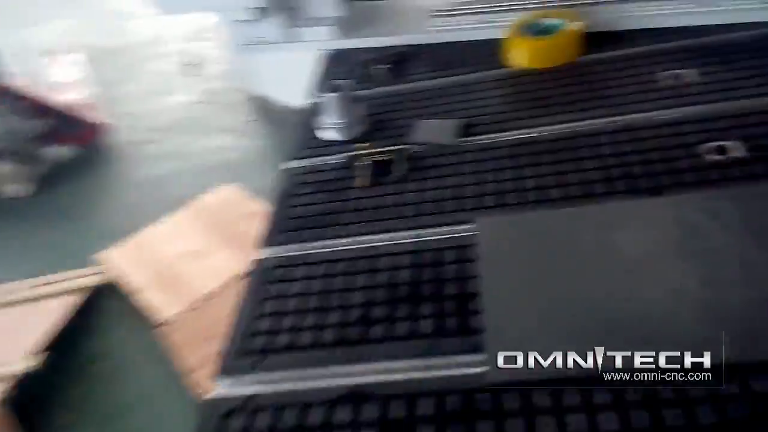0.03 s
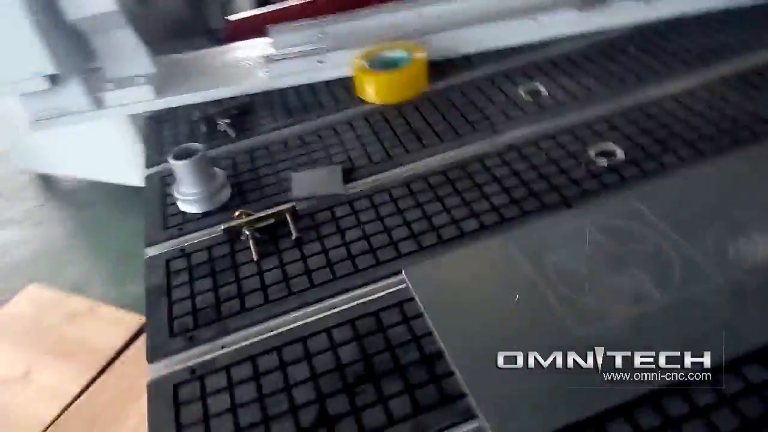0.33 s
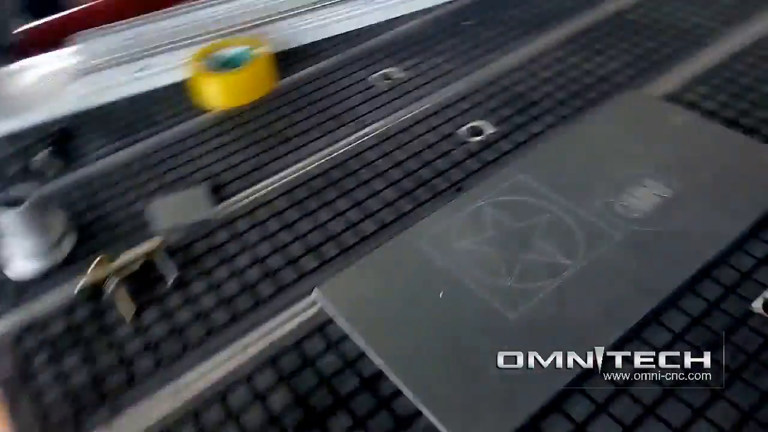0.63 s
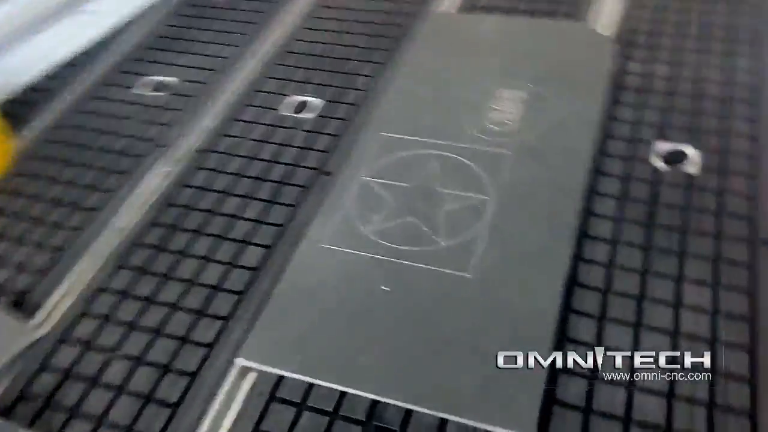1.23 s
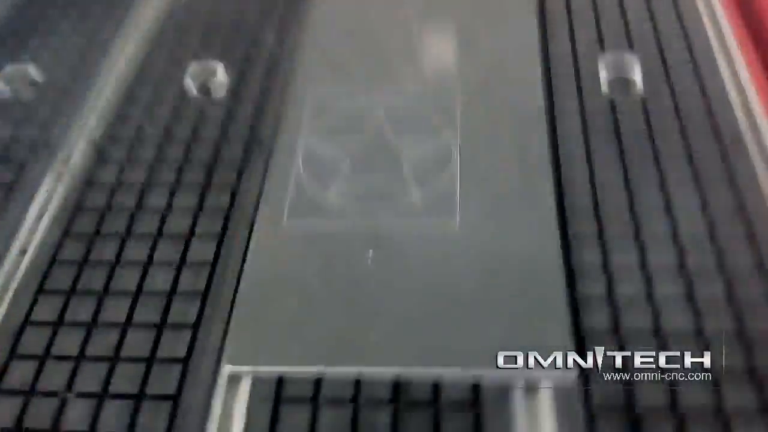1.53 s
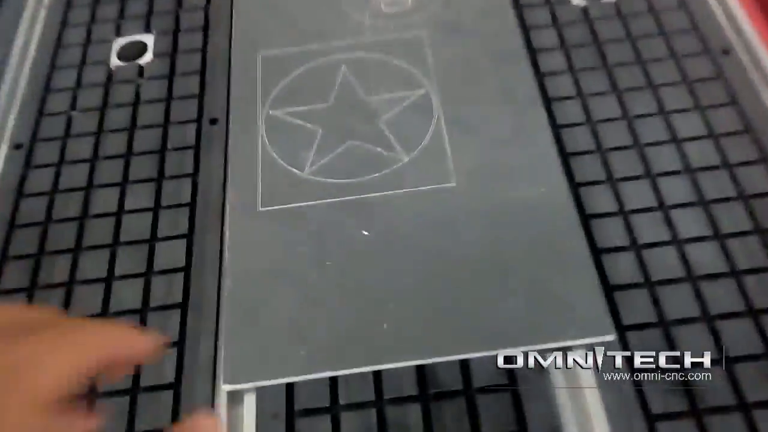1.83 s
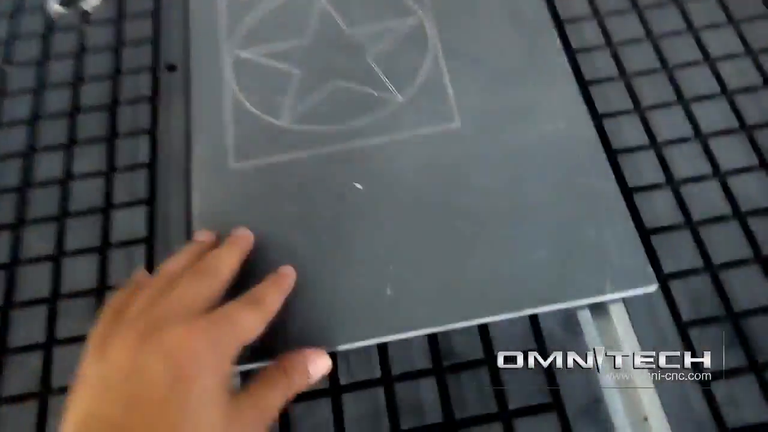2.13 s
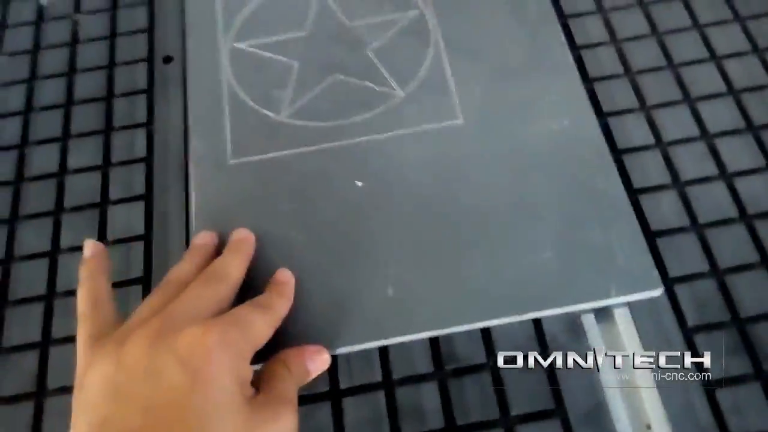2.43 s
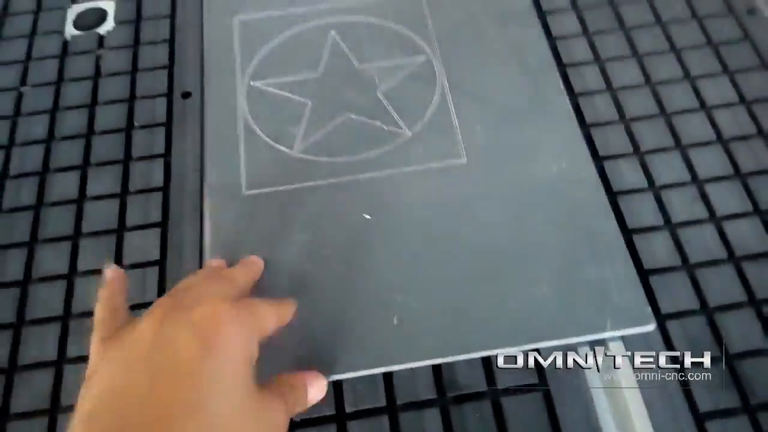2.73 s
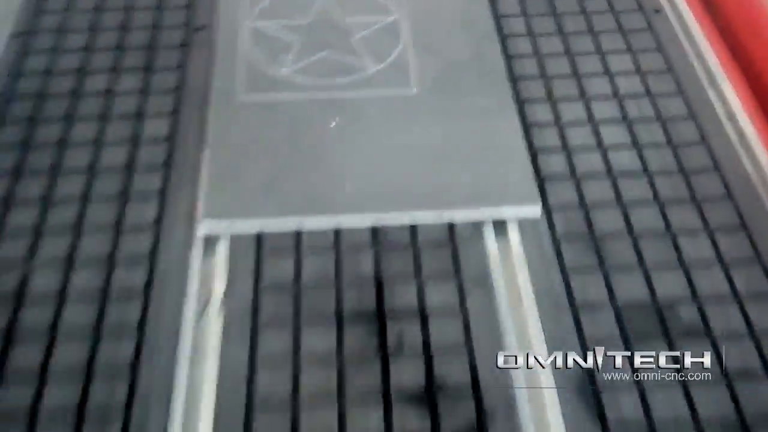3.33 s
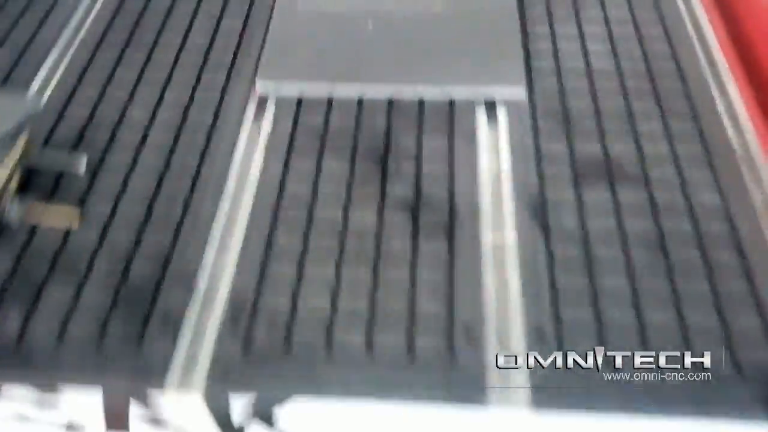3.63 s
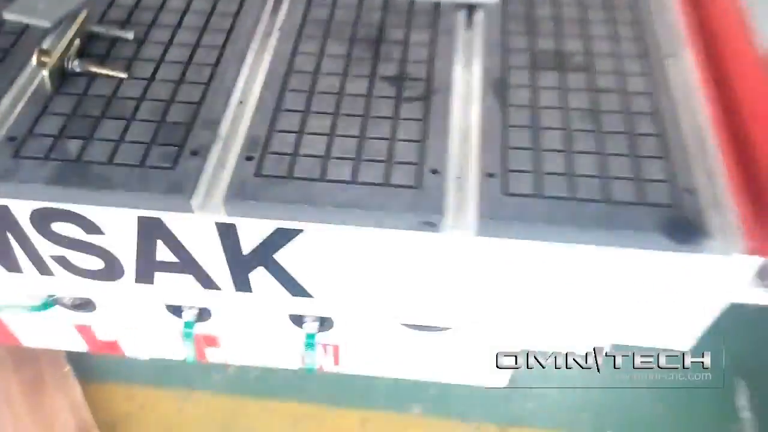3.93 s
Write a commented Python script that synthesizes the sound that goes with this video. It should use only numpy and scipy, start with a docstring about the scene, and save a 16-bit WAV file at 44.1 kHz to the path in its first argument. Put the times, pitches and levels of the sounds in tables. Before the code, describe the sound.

Air hisses loudly through the slots of a workshop machine table over a vacuum pump's constant humming, whining roar. The moving microphone passes close to a board's edge, where the hiss swells before softening into a bright rush.

```python
"""A vacuum pump holds a board on a workshop machine table; the microphone moves over the table.
From the start the pump hums and whines on multiples of its shaft speed over a steady roar, and air
leaking into the table hisses in broad resonances, at first mostly at the slots. From about 1.3 s the
microphone nears the board's edge and the hiss grows, loudest between 2 and 3 s. Toward 4 s the edge
hiss eases and the bright rush of the open slots returns."""
import sys
import numpy as np
from scipy import signal
from scipy.fft import rfft, irfft
from scipy.io import wavfile
from scipy.ndimage import uniform_filter1d, minimum_filter1d

SR = 44100
rng = np.random.default_rng(int(sys.argv[2]) if len(sys.argv) > 2 else 0)


def put_to_file(sound):
    """Save the sound as 16-bit audio at rate SR, in the file named by the first command-line argument."""
    columns = np.atleast_2d(sound).T  # one column per channel
    safe = np.clip(columns, -1, 1)
    whole_steps = np.round(safe * 32767)
    wavfile.write(sys.argv[1], SR, whole_steps.astype(np.int16))


N = 176400
T = np.arange(N) / SR
SHAFT_HZ, SPEED_WANDER_RMS = 49.865, .0006
HUM_ORDER, WHINE_ORDER = 8, 56

# Noise spectra. Each row: frequency in Hz, relative density in dB.
RUMBLE_SPECTRUM = [(20, -19), (35, -23), (58, -27), (88, -14), (100, -12), (125, -6), (165, -7.5),
                   (210, 4.5), (255, -8), (340, -14.5), (500, -28.5)]
ROAR_SPECTRUM = [(20, -40), (150, -28), (280, -7), (350, -5), (460, -4), (560, -2), (720, 1), (1000, -4.5),
                 (1250, -6), (1700, -5.5), (2200, -8.5), (4000, -20.5), (15000, -50)]
EDGE_SPECTRUM = [(900, -24.5), (1600, -12), (2200, -8), (2550, -1.5), (2800, 0.5), (3100, -1), (3600, 1),
                 (4100, -2), (4500, -48), (8000, -58)]
SLOT_SPECTRUM = [(3000, -35), (3500, -11), (3850, -2.5), (4230, 1.5), (4430, -7), (4800, -12), (5600, -12),
                 (9000, -55)]
RUSH_SPECTRUM = [(3700, -25), (4250, -1), (4450, 0), (4750, -1), (5100, -3), (5500, -15), (7000, -35)]  # open slots beside the board
SEAL_SPECTRUM = [(3300, -22.5), (4400, -4), (5000, -4), (5450, 0.5), (6300, 0.5), (6550, -3.5),
                 (6800, -9.5), (7400, -13), (8100, -23.5), (9500, -37), (15000, -62)]
SIZZLE_SPECTRUM = [(6000, -22), (8000, -2.5), (9000, 1), (9700, 0.5), (10700, -4), (11700, -12.5),
                   (13500, -15), (15500, -19)]
PINHOLE_SPECTRUM = [(10000, -19), (11500, -12), (12250, -12), (12700, 0), (13150, -5), (14000, -9),
                    (15400, -21)]

# Levels along the microphone's path. Each row: time in seconds, relative level in dB.
RUMBLE_PATH_DB = [(0, -38.5), (.8, -39), (1.3, -36.5), (2.5, -34.5), (4, -36)]
ROAR_PATH_DB = [(0, -23.5), (.75, -24), (1.3, -23), (2.2, -23.5), (3.5, -23.5), (4, -23)]
HUM_PATH_DB = [(0, -28.5), (.2, -22), (.38, -22.7), (.72, -31.5), (.92, -29), (1.12, -31), (1.65, -29.5),
               (2.0, -26), (2.95, -24), (3.55, -25.5), (3.87, -28.5), (4, -38)]
WHINE_PATH_DB = [(0, -31.5), (.6, -33.5), (.98, -39), (1.1, -27.5), (1.4, -30.5), (1.62, -26.5),
                 (2.05, -26), (2.4, -35), (2.75, -28.5), (3.3, -29), (3.68, -32.5), (3.84, -26), (4, -28)]
EDGE_PATH_DB = [(0, -29.5), (.65, -31), (.82, -34.5), (1.1, -33), (1.4, -24), (1.7, -20.5), (1.87, -18.5),
                (2.3, -17.5), (2.92, -17), (3.33, -18), (3.5, -20.5), (4, -26)]
SLOT_PATH_DB = [(0, -19), (.2, -20), (.7, -17), (1.02, -17.5), (1.2, -20.5), (1.65, -23.5), (1.87, -18),
                (2.3, -17.5), (2.6, -18.5), (3.0, -17), (3.33, -25), (4, -23)]
RUSH_PATH_DB = [(0, -24), (.4, -24.5), (.7, -23), (1.0, -28), (1.3, -40), (2.3, -37), (3.2, -30), (4, -23)]
SEAL_PATH_DB = [(0, -28), (.38, -24), (.62, -25), (.93, -24), (1.3, -17.5), (1.45, -21), (1.85, -21),
                (2.15, -21), (2.45, -17), (2.85, -17.5), (3.2, -19), (4, -20.5)]
SIZZLE_PATH_DB = [(0, -45.5), (.5, -46), (1.05, -46), (1.4, -49), (1.58, -41.5), (2.7, -41.5), (3.4, -42.5),
                  (4, -48)]
PINHOLE_PATH_DB = [(0, -50), (.35, -48), (.72, -45), (1.08, -43.5), (1.26, -48), (1.33, -58), (1.55, -57),
                   (2.5, -56), (3.4, -57.5), (4, -58)]

# Hollow resonances of the roar. Each row: peak time in seconds, half-length in seconds,
# frequency in Hz, peak level in dB.
ROAR_HOLLOWS = [(0.01, 0.082, 646, -25), (.14, 0.37, 764.5, -28), (.25, 0.85, 516, -33),
                (.42, 0.32, 1400, -35), (0.542, 0.2, 1710, -33.5), (.68, 0.4, 1467, -33),
                (1.384, .28, 1247, -34.5), (1.49, 0.2, 906, -29), (2.28, 0.2, 1034, -32)]
# Weak shaft tones. Each row: multiple of the shaft speed, level in dB.
SHAFT_TONES = [(2, -54.5), (6, -44), (12, -41.5), (16, -45)]
# Quiet spots in the whine's standing waves. Each entry: time of passing in seconds.
WHINE_NODES_S = [.19, .45, .79, 1.48, 1.8, 2.14, 3.0, 3.46]
# Leak resonances that surge as the microphone passes. Each row: peak time in seconds,
# half-length in seconds, frequency in Hz, half-width in Hz, peak level in dB.
LEAK_SURGES = [(.27, .2, 9600, 300, -47), (.62, .3, 5140, 160, -30), (2.273, .2, 3850, 170, -21),
               (2.72, 0.35, 6250, 170, -24), (2.88, .16, 7000, 200, -31), (2.97, 0.18, 3940, 150, -18),
               (3.5, 0.33, 9800, 350, -44.5), (3.83, .25, 12720, 110, -58)]


def amp(db):
    """Decibels to gain."""
    return 10 ** (np.asarray(db) / 20)


def unit_rms(x):
    """Scales to rms 1."""
    return x / np.sqrt(np.mean(x ** 2) + 1e-20)


def path_gain(path_db):
    """Gain over time, interpolated in dB."""
    return amp(np.interp(T, *np.transpose(path_db)))


def spectrum_db(spectrum, hz, skirt_db_per_octave=36):
    """Spectrum interpolated in log frequency, falling off above its last row."""
    row_hz, row_db = np.transpose(spectrum)
    skirt_db = skirt_db_per_octave * np.maximum(np.log2((hz + 1) / row_hz[-1]), 0)
    return np.interp(np.log(hz + 1), np.log(row_hz), row_db) - skirt_db


def drift(rate_hz):
    """Random motion of rms 1, mostly below rate_hz."""
    hz = np.fft.rfftfreq(N, 1 / SR)
    white = rfft(rng.standard_normal(N))
    return unit_rms(irfft(white * (hz > 0) / (1 + (hz / rate_hz) ** 3), N))


def turbulence(spectrum, eddy_db, flutter_db):
    """Turbulent air, rms 1: coloured noise with drifting eddies and quick flutter."""
    hz, _, bins = signal.stft(rng.standard_normal(N), SR, nperseg=2048, noverlap=1536)
    patches = uniform_filter1d(rng.standard_normal(bins.shape), size=6, axis=0)
    eddies = unit_rms(uniform_filter1d(patches, size=14, axis=1))
    bins *= amp(spectrum_db(spectrum, hz)[:, None] + eddy_db * eddies)
    noise = signal.istft(bins, nperseg=2048, noverlap=1536)[1][:N]
    return unit_rms(noise * amp(flutter_db * drift(60)))


def resonance(peak_s, half_length_s, hz, half_width_hz, peak_db):
    """Air-blown resonance: a noise band that swells and fades."""
    band = (drift(half_width_hz) + 1j * drift(half_width_hz)) * np.exp(2j * np.pi * hz * T)
    envelope = np.exp(-2 * ((T - peak_s) / half_length_s) ** 2)
    return amp(peak_db) * envelope * band.real


def motor_rumble():
    """Low, fluttering noise of the motor."""
    return path_gain(RUMBLE_PATH_DB) * turbulence(RUMBLE_SPECTRUM, eddy_db=0, flutter_db=.6)


def pump_roar():
    """Steady roar; hollow resonances stand out briefly along the path."""
    roar = path_gain(ROAR_PATH_DB) * turbulence(ROAR_SPECTRUM, eddy_db=1.8, flutter_db=-.13)
    hollows = sum(resonance(peak_s, half_length_s, hz, half_width_hz=23, peak_db=db)
                  for peak_s, half_length_s, hz, db in ROAR_HOLLOWS)
    return roar + hollows


def shaft_tone(turns, order, waver_db, smear_rad):
    """One wavering multiple of the shaft speed; phase jitter stands for the workshop's echoes."""
    phase_rad = 2 * np.pi * (order * turns + rng.random()) + smear_rad * drift(13)
    return unit_rms(np.sin(phase_rad) * amp(waver_db * drift(20)))


def pump_tones():
    """Hum, blade whine and weak tones of one shaft; the whine nulls at standing-wave nodes."""
    turns = np.cumsum(SHAFT_HZ * (1 + SPEED_WANDER_RMS * drift(2.35))) / SR
    hum = path_gain(HUM_PATH_DB) * shaft_tone(turns, HUM_ORDER, waver_db=1.22, smear_rad=.07)
    whine = path_gain(WHINE_PATH_DB) * shaft_tone(turns, WHINE_ORDER, waver_db=.6, smear_rad=.22)
    standing_wave = np.prod([np.tanh((T - node_s) / .041) for node_s in WHINE_NODES_S], axis=0)
    weak_tones = sum(amp(db) * shaft_tone(turns, order, waver_db=2, smear_rad=.7)
                     for order, db in SHAFT_TONES)
    return hum + standing_wave * whine + weak_tones


def jet(spectrum, path_db, eddy_db, flutter_db, trim_db=0):
    """Small air jet: turbulence with no bass."""
    highpass = signal.butter(2, 700, "high", fs=SR, output="sos")
    hiss = signal.sosfilt(highpass, turbulence(spectrum, eddy_db, flutter_db))
    return amp(trim_db) * path_gain(path_db) * hiss


def air_leaks():
    """Air drawn through the gaps around the board and the table's slots."""
    edge = jet(EDGE_SPECTRUM, EDGE_PATH_DB, eddy_db=.8, flutter_db=.6, trim_db=1.63)
    slot = jet(SLOT_SPECTRUM, SLOT_PATH_DB, eddy_db=1.1, flutter_db=.5, trim_db=-1.5)
    rush = jet(RUSH_SPECTRUM, RUSH_PATH_DB, eddy_db=3.5, flutter_db=-.5)
    seal = jet(SEAL_SPECTRUM, SEAL_PATH_DB, eddy_db=1.5, flutter_db=.4, trim_db=.04)
    sizzle = jet(SIZZLE_SPECTRUM, SIZZLE_PATH_DB, eddy_db=1.9, flutter_db=.8, trim_db=-1)
    pinhole = jet(PINHOLE_SPECTRUM, PINHOLE_PATH_DB, eddy_db=1.7, flutter_db=-1.5, trim_db=-1)
    surges = sum(resonance(*row) for row in LEAK_SURGES)
    return edge + slot + rush + seal + sizzle + pinhole + surges


def scene():
    """Pump and leaks, the same in both channels."""
    return np.tile(motor_rumble() + pump_roar() + pump_tones() + air_leaks(), (2, 1))


def record(dry, ceiling=.93, limiter_s=.004, cutoff_hz=15450):
    """Smooth peak limiter, then low-pass."""
    window = round(limiter_s * SR)
    safe_gain = ceiling / np.maximum(abs(dry).max(0), ceiling)
    smooth_gain = uniform_filter1d(minimum_filter1d(safe_gain, size=window), size=window)
    lowpass = signal.firwin(511, cutoff_hz, window=("kaiser", 9), fs=SR)
    return signal.oaconvolve(dry * smooth_gain, lowpass[None], "same")


dry = scene()
out = record(dry)
put_to_file(out)
```